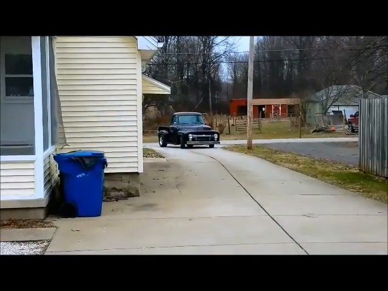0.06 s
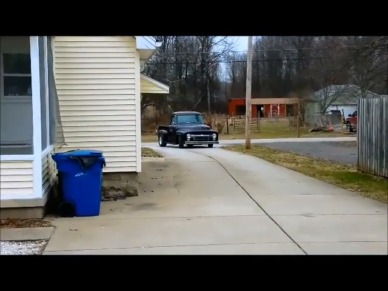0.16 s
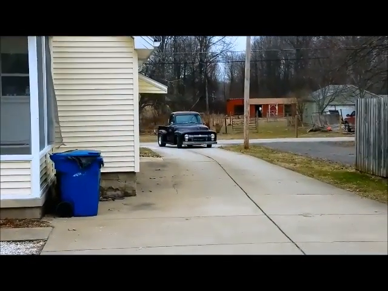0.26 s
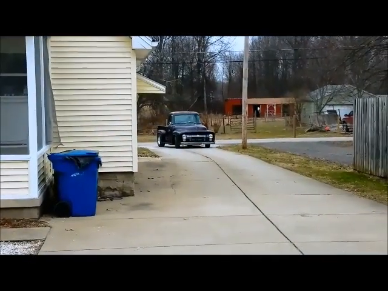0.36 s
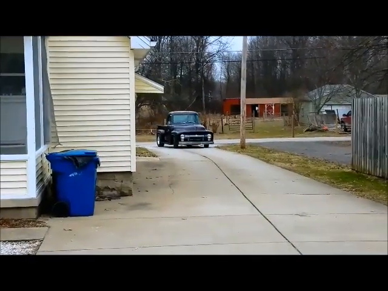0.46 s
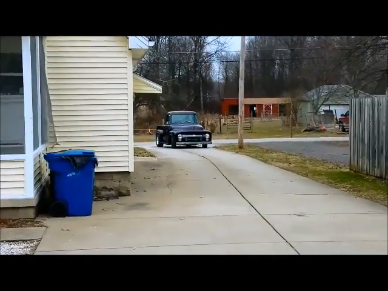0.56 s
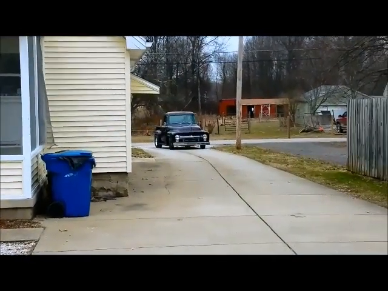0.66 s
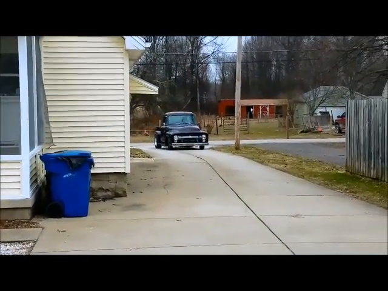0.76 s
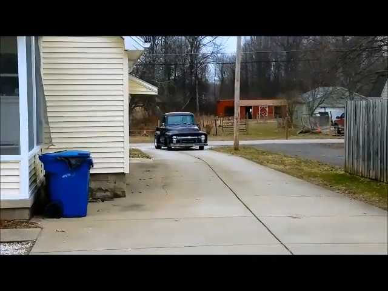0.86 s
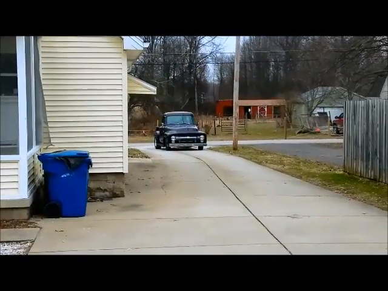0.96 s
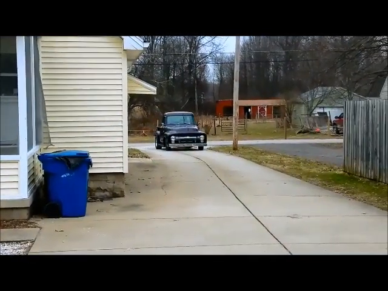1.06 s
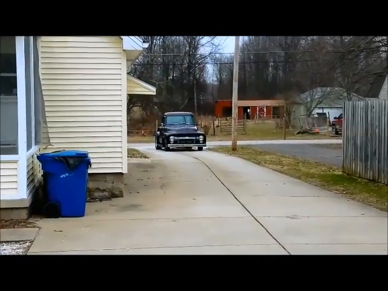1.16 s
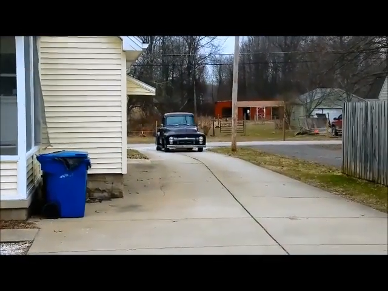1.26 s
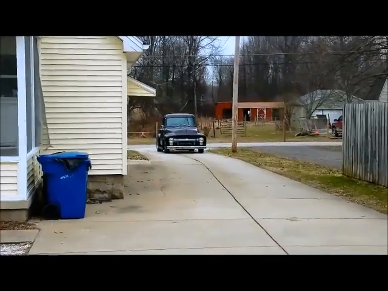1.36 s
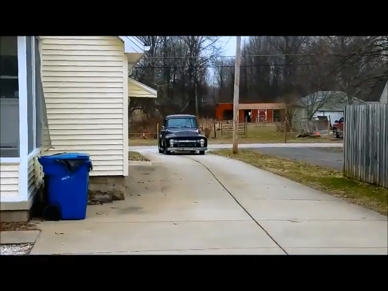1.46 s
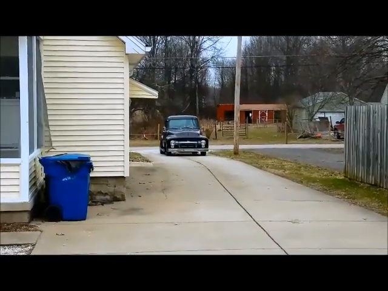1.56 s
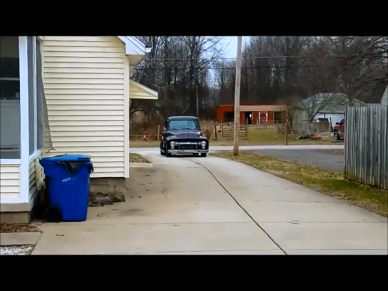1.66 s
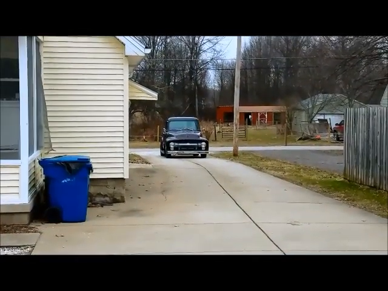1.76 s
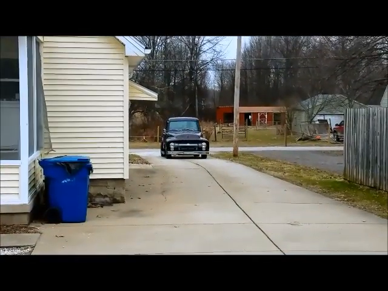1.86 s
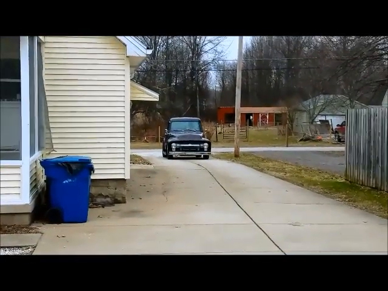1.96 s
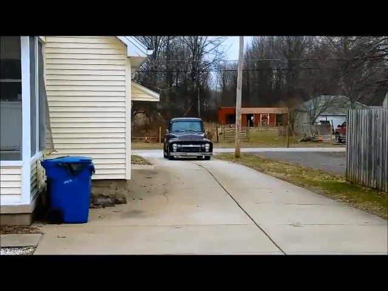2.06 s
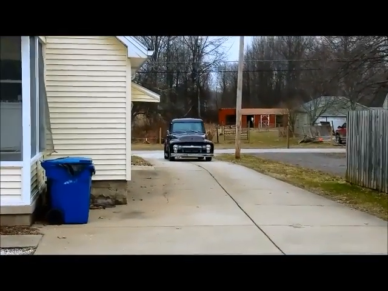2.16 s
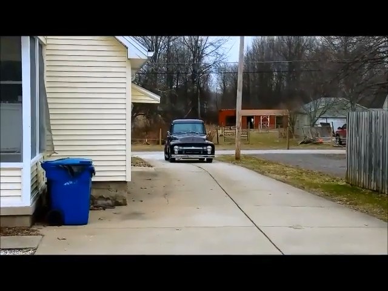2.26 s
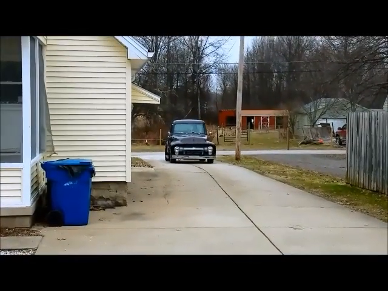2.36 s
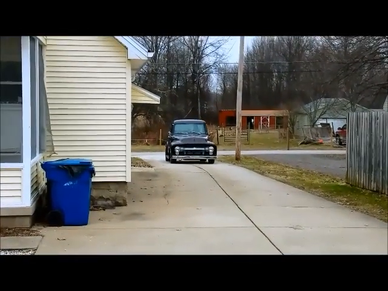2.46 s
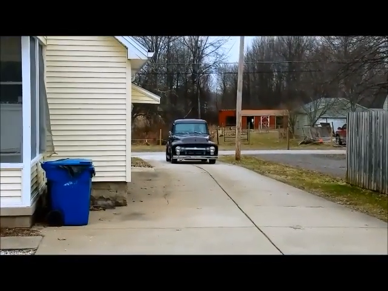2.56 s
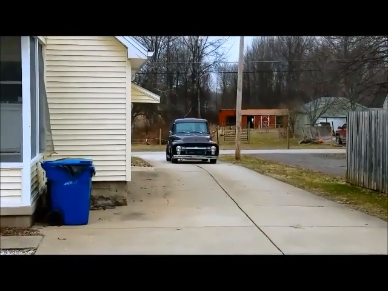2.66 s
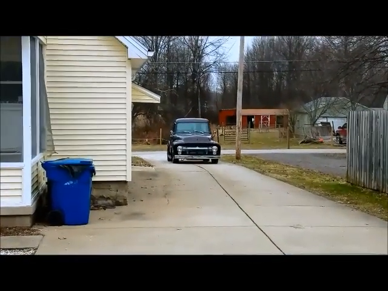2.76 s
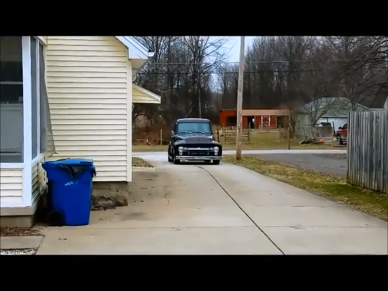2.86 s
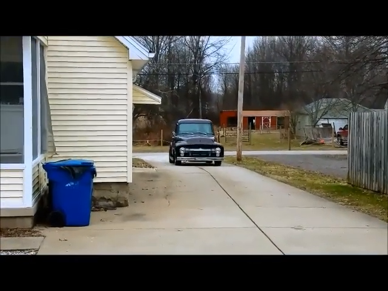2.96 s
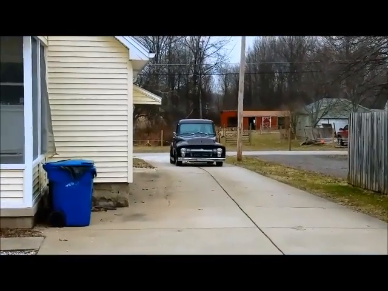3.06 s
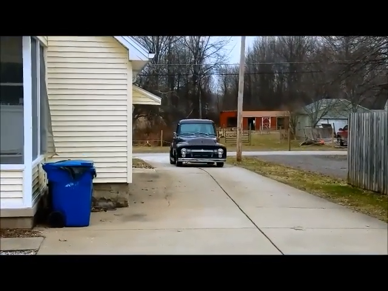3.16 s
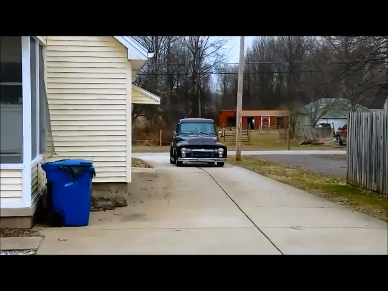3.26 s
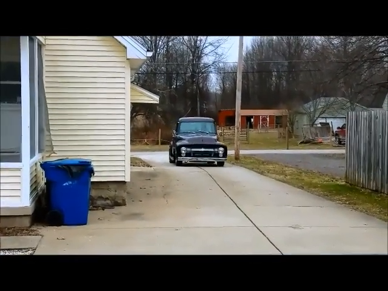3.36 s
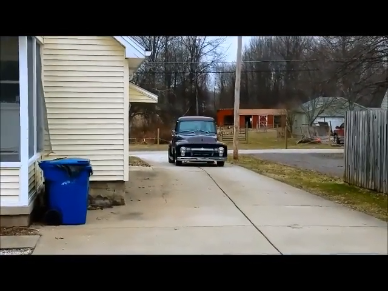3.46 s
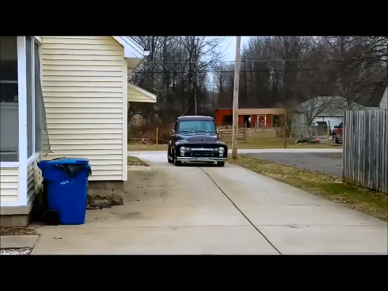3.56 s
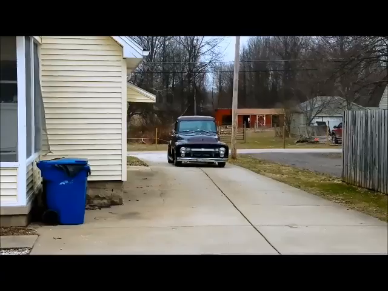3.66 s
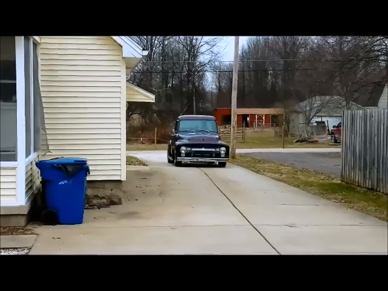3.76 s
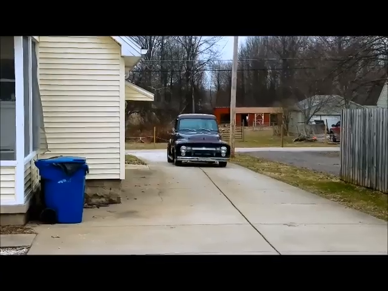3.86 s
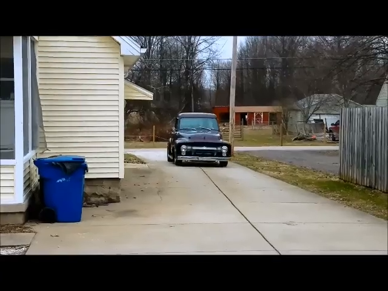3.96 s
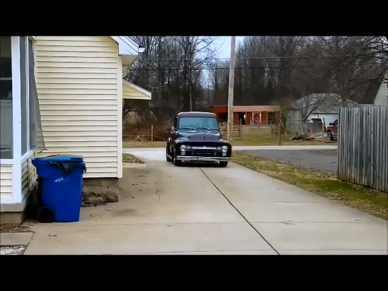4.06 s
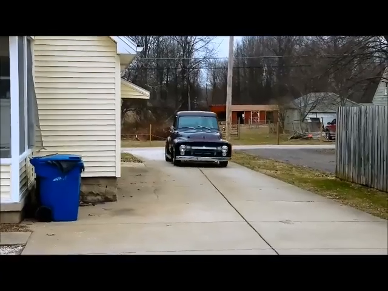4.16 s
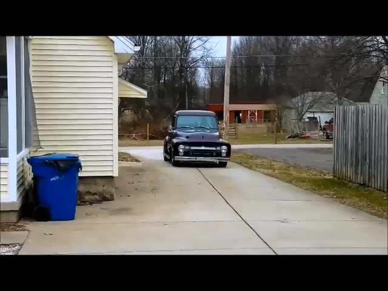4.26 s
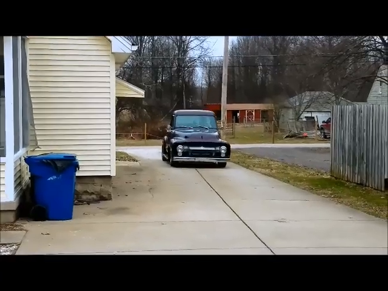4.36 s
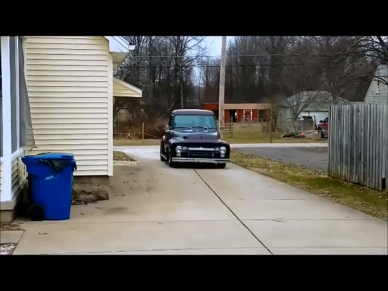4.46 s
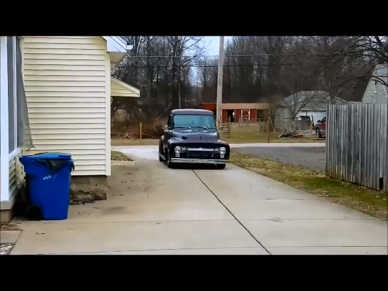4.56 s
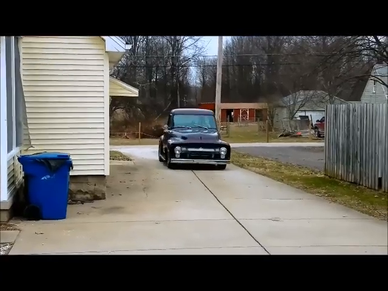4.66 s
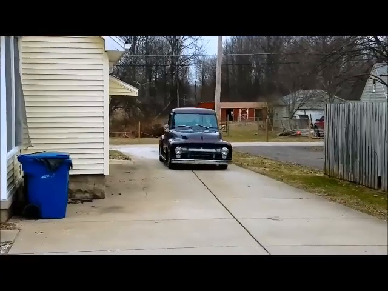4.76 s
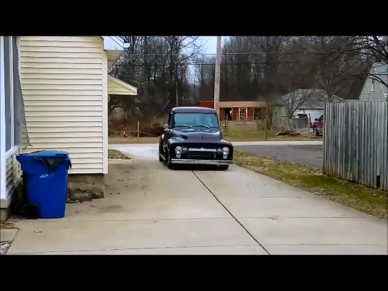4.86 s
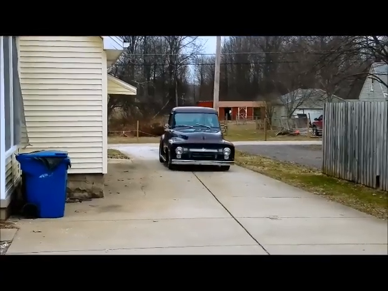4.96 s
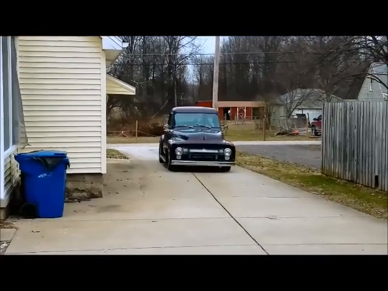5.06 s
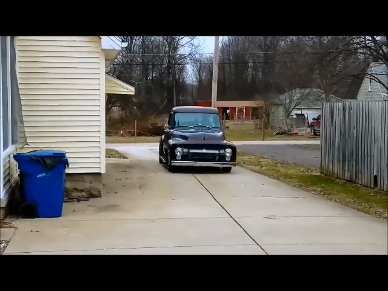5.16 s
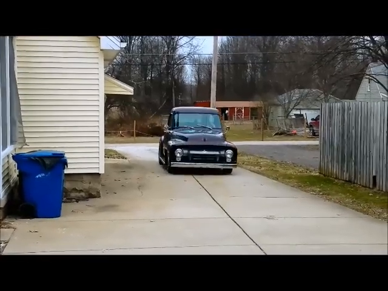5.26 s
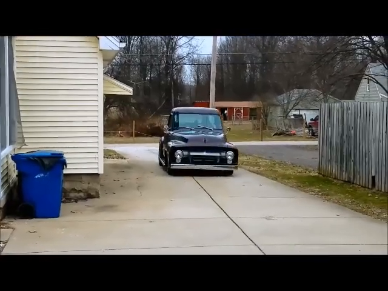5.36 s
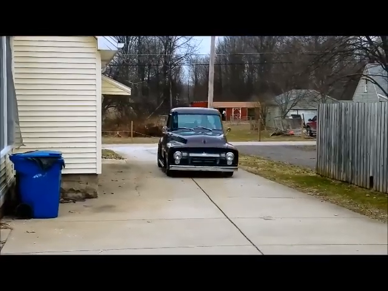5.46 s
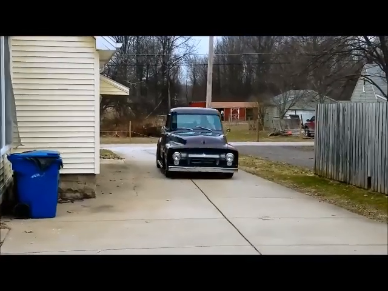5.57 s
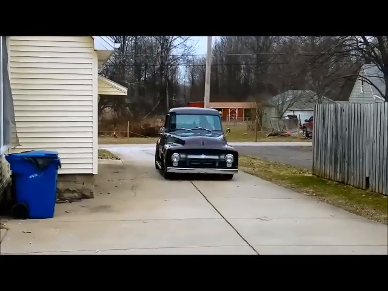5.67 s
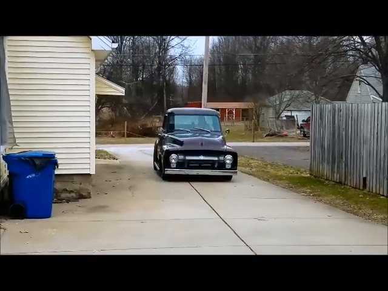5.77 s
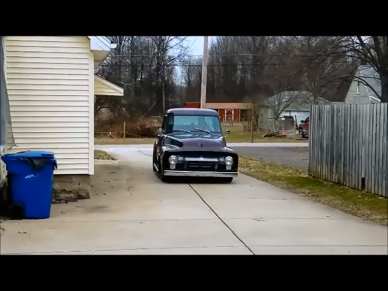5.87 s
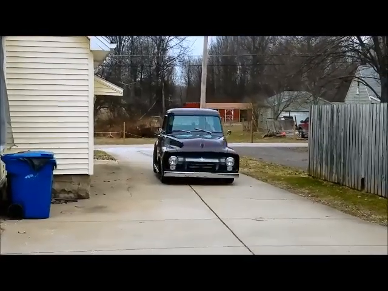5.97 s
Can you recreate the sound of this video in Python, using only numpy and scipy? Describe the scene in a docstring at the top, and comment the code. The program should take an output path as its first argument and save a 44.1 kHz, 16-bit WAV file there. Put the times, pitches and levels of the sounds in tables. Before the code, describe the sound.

An old V8 pickup burbles up a driveway towards the listener, its drone and whirr growing louder, with small clicks and cloth rustles close by.

```python
"""On a driveway off a street, an old V8 pickup turns in and rolls slowly up towards the listener; at the end it coasts.
Puffs of exhaust ring pipe resonances as a burble and bark, over a drone of harmonics of the firing rate.
Fan, valve gear and tyres whirr and hiss as shaped noise, louder as it nears; the street tyres fade away.
An electric fan hums in three partials. Close by, a jacket rustles in swells of noise, and small clicks
are brief noise bursts ringing in narrow bands."""
import sys
import numpy as np
from scipy import signal
from scipy.fft import rfft, irfft, next_fast_len
from scipy.io import wavfile
from scipy.ndimage import uniform_filter1d

SR = 44100
rng = np.random.default_rng(int(sys.argv[2]) if len(sys.argv) > 2 else 0)


def dump(signal):
    """Clip the signal to [-1, 1] and save it as 16-bit WAV at the path in sys.argv[1]."""
    limited = np.clip(np.atleast_2d(signal).T, -1, 1)
    pcm = np.round(limited * 32767).astype(np.int16)
    wavfile.write(sys.argv[1], SR, pcm)


N = 265041
# the engine is already running: the time axis [s] starts at least a quarter second before zero
SAMPLES = next_fast_len(N + SR // 4)
T = np.arange(N - SAMPLES, N) / SR

# engine speed: (time [s], firing rate [firings/s])
FIRING_RATE = [(0, 86), (.2, 85), (.88, 70.6), (1.1, 69.7), (1.4, 75.7), (1.75, 77.9), (1.95, 81.5),
               (2.4, 84.8), (2.55, 85.5), (2.7, 84.2), (2.85, 86.8), (3.1, 89.7), (3.5, 91.3), (4.35, 95.2),
               (4.8, 95.7), (5.25, 95), (5.52, 86.2), (5.65, 88.8), (6.01, 86.4)]
# the driver's foot: (time [s], throttle opening [0-1])
THROTTLE = [(0, 0.4), (.2, 0), (.45, 0.78), (.7, 0.72), (.88, 0.57), (1.22, 0.54), (1.6, 1), (1.8, 1),
            (2, 0.76), (2.56, 0.48), (2.6, 0.4), (2.75, 0.23), (2.83, 0.7), (3.1, 0.47), (3.52, 0.9),
            (5.3, 0.85), (5.52, 0.48), (5.65, 0.7), (6.01, 0.75)]
# the approach: (time [s], distance [m])
DISTANCE = [(0, 34.2), (2.4, 32.3), (3.5, 25.6), (5, 20.5), (6.01, 18.3)]
FAR_M, CRUISE_FIRINGS_PER_S = 34, 85
# swing round into the driveway, and onset of coasting
TURN_START_S, TURN_LENGTH_S = 1.14, 0.58
COAST_START_S, COAST_LENGTH_S = 5.26, 0.1

# relative puff of each cylinder in firing order, whose mean is taken off before use: strength [ratio]
CYLINDER_PUFFS = [0.95, -1.28, -0.98, 1.47, 0.7, 0.35, 0.02, -1.21]
# random spread of puff strength while driving, and what coasting adds to it [ratio]
RAGGED, RAGGED_COASTING = 0.15, 0.4
# from the tailpipes, under the truck, round its side, off house wall and fence:
# (lag at the start [s], lag at the end [s], level [dB])
EXHAUST_PATHS = [(.0021, .0021, 0), (.0137, .0034, -10.6), (.01, .0097, -15.3), (.0461, .0399, -13.8)]
# exhaust pipe resonances: (frequency [Hz], width [Hz], level [dB])
PIPE_LOW = [(100.8, 39, -3.9), (125.2, 11, 6.7), (136.1, 9, 12.1), (156, 9, 7.5), (172.6, 9, 8.2)]
# upper pipe resonances, the bark: (frequency [Hz], width [Hz], level [dB])
PIPE_HIGH = [(184.7, 9, -4.2), (201.6, 15.5, 11.5), (223, 44, 5.2), (242, 24.5, 6.3)]
# the burble swells and sinks about its level law: (time [s], level [dB])
BURBLE_SWELL = [(1.3, -1), (2, 1.5), (2.45, 0), (2.7, 1.5), (3.3, -4), (3.8, 0.5), (4.8, 0.5), (5.45, 3),
                (5.53, -1), (5.85, -0.5)]
# faint overtones of the drone: (multiple of the firing rate, level [dB])
OVERTONES = [(3, -52.5), (4, -56)]
# at one distance an echo weakens the drone's octave
NULL_SPOT_M, NULL_WIDTH_M, NULL_DEPTH_DB = 20.9, 1.7, 16

# Level laws of the truck's parts, each one row: (level when far, cruising and at half throttle [dB],
# rise per halving of distance [dB], rise per doubling of engine speed [dB],
# rise from shut to open throttle [dB], gain once turned in [dB])
# fundamental of the firing rate
DRONE_LAW = (-32.5, 5.5, 3.5, 22, 0)
# its second harmonic
OCTAVE_LAW = (-41, 4.5, -12, 18, 4.5)
# puffs in the lower pipe resonances
BURBLE_LAW = (-30, 7, 4, -3, 4.5)
# puffs in the upper pipe resonances
BARK_LAW = (-37, 4, 0, -5, 7.5)
# puffs in a narrow band above the resonances
RASP_LAW = (-56.5, 11, 5, 24.5, -2.5)
# throbbing engine noise
ROAR_LAW = (-39, 5, 3, -1, 1.5)
# pulsing fan and valve gear
WHIRR_LAW = (-51, 7.5, 4, 0.5, -1.35)
# fan air and tyres
HISS_LAW = (-64, 12, 9.5, 0, -1.5)
# bass noise
RUMBLE_LAW = (-41, 17, -16, -5, 0)

# relative noise spectrum of the roar: (frequency [Hz], density [dB per Hz])
ROAR_SPECTRUM = [(200, 8.5), (310, 5), (380, -4.5), (450, -3), (520, -1), (580, -6.5), (700, -9),
                 (930, -13.5), (1150, -14.5), (1500, -35)]
# of fan and valve gear: (frequency [Hz], density [dB per Hz])
WHIRR_SPECTRUM = [(590, -66), (1000, -4), (1100, 0.5), (1290, 1), (1400, 7), (1480, 3), (1660, 3),
                  (2150, 2), (2590, 3), (2910, -2), (3150, .5), (4260, -10), (5100, -12), (5950, -12.5),
                  (7000, -35), (9100, -52), (15400, -120)]
# of the bass rumble: (frequency [Hz], density [dB per Hz])
RUMBLE_SPECTRUM = [(20, -17.5), (45, -16.5), (65, -5.5), (120, 0.5), (300, -31), (500, -28)]
# of the tyres on the street: (frequency [Hz], density [dB per Hz])
STREET_SPECTRUM = [(600, -12), (820, 2), (1100, -8), (1500, -17)]
# of the hiss of fan air and tyres: (frequency [Hz], density [dB per Hz])
AIR_SPECTRUM = [(3500, -16), (5000, 3), (6100, 3), (6900, -3), (7800, 1.5), (10000, -0.5), (11200, -2),
                (15500, -2)]
# of the jacket cloth: (frequency [Hz], density [dB per Hz])
CLOTH_SPECTRUM = [(1000, -37), (2200, 6), (3300, 5.5), (4400, 1.5), (5800, 0.5), (6900, -16), (8000, -10),
                  (15500, -13.5)]
# stereo width of the noises: (frequency [Hz], side minus mid [dB])
WIDTH = [(60, -27), (110, -27), (200, -27), (380, -13), (700, -11.5), (1290, -1.5), (2380, -4.5), (4400, 1),
         (8120, -2.5), (15000, 0)]
# stereo balance of the noises: (frequency [Hz], left minus right [dB])
LEAN = [(60, -1.5), (500, -1.5), (1000, -2.5), (2000, 4.5), (3200, -1.5), (4500, -5), (6000, -7),
        (8000, -1), (11000, -1), (15000, 4)]

# common level of the electric fan's partials: (time [s], level [dB])
HUM_LEVEL = [(0, -64), (.5, -50.5), (1.9, -52.5), (2.1, -46.5), (3.6, -44), (4.2, -40.5), (6.01, -44.5)]
# partials of the hum: (multiple of its frequency, relative level [dB])
HUM_PARTIALS = [(1, 3.5), (2, 1), (3, -15)]
# jacket rustles: (time of the middle [s], level [dB], length [s], added treble [dB])
RUSTLES = [(0.087, -51, 0.048, -18), (0.187, -52.5, 0.048, -10), (0.273, -52.5, 0.052, -10),
           (0.467, -48.5, 0.027, -3), (0.51, -50, 0.032, -4), (0.624, -54, 0.044, 0),
           (0.728, -54.5, 0.039, -1), (0.792, -56, 0.092, 0), (1.17, -57, 0.013, -6),
           (2.627, -57.5, 0.04, 5), (3.317, -55.5, 0.06, 7.5), (4.128, -57.5, 0.05, 9),
           (4.24, -60.5, 0.046, 14.5), (4.417, -51, 0.047, 3.5), (4.652, -49, 0.066, 3.5),
           (4.859, -53, 0.03, 9.5), (4.937, -49, 0.053, 7.5), (5.156, -48, 0.054, 5.5),
           (5.528, -48.5, 0.055, 8.5)]
# small clicks: (time [s], peak level [dB], lower band edge [Hz], upper band edge [Hz])
CLICKS = [(.819, -34.5, 1500, 3000), (0.9966, -26.5, 1970, 3300), (1.0233, -26.5, 1000, 3500),
          (1.0255, -32, 800, 1790), (1.0325, -33.5, 1300, 3480), (1.0615, -41, 2200, 4100),
          (1.1627, -39, 1490, 6200), (1.1662, -33, 750, 3000), (1.1928, -39, 1500, 4500),
          (2.562, -38, 1700, 3200), (2.827, -47, 8500, 11400)]


def from_db(db):
    """Amplitude ratio: twenty decibels are a factor of ten."""
    return 10 ** (np.asarray(db) / 20)


def rms_one(x):
    """Normalisation of a signal to unit mean power."""
    return x / np.sqrt(np.mean(x ** 2) + 1e-20)


def in_time(rows):
    """Linear interpolation: each column of a curve table at every sample."""
    s, *columns = np.transpose(rows)
    return [np.interp(T, s, column) for column in columns]


def at_hz(points, hz):
    """Linear interpolation of a spectrum along a logarithmic frequency axis."""
    f, value = np.transpose(points)
    return np.interp(np.log(hz), np.log(f), value)


def ramp(start_s, length_s):
    """Linear transition from 0 to 1, then held."""
    return np.clip((T - start_s) / length_s, 0, 1)


def drift(rate_hz):
    """Low-passed random fluctuation of unit rms, made at a fortieth of the sample rate."""
    step, settling = 40, 2000
    r = np.exp(-2 * np.pi * rate_hz * step / SR)
    white = rng.standard_normal(SAMPLES // step + 2 + settling)
    slow = signal.lfilter([1], [1, -2 * r, r * r], white)[settling:]
    return np.interp(np.arange(SAMPLES) / step, np.arange(len(slow)), rms_one(slow))


def resonate(x, hz, width_hz):
    """Damped resonance: a pole pair whose radius sets the bandwidth, with unit gain at its peak."""
    r = np.exp(-np.pi * width_hz / SR)
    numerator = np.array([1, 0, -1]) * (1 - r * r) / 2
    denominator = [1, -2 * r * np.cos(2 * np.pi * hz / SR), r * r]
    return signal.lfilter(numerator, denominator, x + 1e-18)


def band(x, low_hz, high_hz, order):
    """Band limitation by a Butterworth filter, maximally flat in its passband."""
    return signal.sosfilt(signal.butter(order, [low_hz, high_hz], "band", fs=SR, output="sos"), x)


def evened(x):
    """Short-term power normalisation over a few engine cycles, with the single beats kept."""
    size = SR // 6
    power = uniform_filter1d(uniform_filter1d(x * x, size), size // 2)
    return x / np.sqrt(power + 1e-14)


def noise(spectrum):
    """Spectral shaping of stereo noise, narrow in the bass and wide in the treble; its middle has rms 1."""
    hz = np.maximum(np.arange(SAMPLES // 2 + 1) * SR / SAMPLES, 1)
    octaves_outside = np.abs(np.log2(hz / np.clip(hz, spectrum[0][0], spectrum[-1][0])))
    # beyond the table the spectrum falls by 60 dB per octave
    shape = from_db(at_hz(spectrum, hz) - 60 * octaves_outside)
    mid, side = rfft(rng.standard_normal((2, SAMPLES))) * shape
    signs = np.array([[1], [-1]])
    spread = mid + signs * side * from_db(at_hz(WIDTH, hz))
    pair = irfft(spread * from_db(signs * at_hz(LEAN, hz) / 2), SAMPLES)
    return pair / np.std(pair.mean(axis=0))


def delayed(x, s):
    """Propagation delay: the same sound arrives later."""
    return np.interp(T - s, T, x, left=0)


def ahead(x, pan_db=-2.0):
    """Interaural difference: a source slightly to the right is later and weaker at the left ear."""
    left = delayed(x, 3 / SR)
    return np.array([left * from_db(pan_db / 2), x * from_db(-pan_db / 2)])


def off_wall(x, wall_db=-16, fence_db=-17, ground_db=-17):
    """Comb filtering: reflections from wall, fence and driveway ripple the spectrum gently."""
    paths = [(0.0046, wall_db), (0.0113, fence_db), (0.001393, ground_db)]
    return x + sum(from_db(db) * np.array([delayed(channel, s) for channel in x]) for s, db in paths)


def level(law):
    """Superposed level changes [dB] from distance, engine speed, throttle and heading."""
    far_db, nearing_db, revving_db, throttle_db, turn_db = law
    (metres,), (speed,), (throttle,) = in_time(DISTANCE), in_time(FIRING_RATE), in_time(THROTTLE)
    return (far_db
            + nearing_db * np.log2(FAR_M / metres)
            + revving_db * np.log2(speed / CRUISE_FIRINGS_PER_S)
            + throttle_db * (throttle - 0.5)
            + turn_db * ramp(TURN_START_S, TURN_LENGTH_S))


def raggedness():
    """Irregular combustion: the spread of firing strength grows while the engine coasts."""
    return RAGGED + RAGGED_COASTING * ramp(COAST_START_S, COAST_LENGTH_S)


def puffs(firings):
    """Pulse excitation, one puff a firing; the uneven turns of the V8's two banks make the burble."""
    at = np.flatnonzero(np.diff(np.floor(firings)))
    chance = rng.standard_normal((len(at), 2))
    ragged = raggedness()[at]
    pattern = np.array(CYLINDER_PUFFS) - np.mean(CYLINDER_PUFFS)
    cylinder = np.floor(firings[at]).astype(int) % len(pattern)
    strength = pattern[cylinder] + ragged * chance[:, 0]
    # ragged firings also stray in time
    late_s = 0.0007 * ragged * chance[:, 1]
    out = np.zeros(SAMPLES)
    out[np.clip(at + (late_s * SR).astype(int), 0, SAMPLES - 1)] = strength
    return out


def pipe(x, modes):
    """Modal superposition: pipe resonances side by side, with alternating signs."""
    return sum((-1) ** k * from_db(db) * resonate(x, hz, width_hz)
               for k, (hz, width_hz, db) in enumerate(modes))


def uneven_exhaust(firings):
    """Forced resonance: uneven puffs ring the pipes and reach the listener by several shifting paths."""
    fired = puffs(firings)
    beats = 0
    for first_s, last_s, db in EXHAUST_PATHS:
        lag_s = np.interp(T, [0, T[-1]], [first_s, last_s])
        beats = beats + from_db(db) * delayed(fired, lag_s)
    low = evened(band(pipe(beats, PIPE_LOW), low_hz=71.4, high_hz=187.8, order=4))
    high = evened(band(pipe(beats, PIPE_HIGH), low_hz=176.3, high_hz=278.0, order=3))
    above = evened(band(beats, low_hz=270.8, high_hz=293.7, order=2))
    burble = from_db(level(BURBLE_LAW) + in_time(BURBLE_SWELL)[0]) * low
    bark = from_db(level(BARK_LAW)) * high
    rasp = from_db(level(RASP_LAW)) * above
    return burble + bark + rasp


def octave_loss():
    """Interference: the loss [dB] of the drone's octave near the spot where an echo opposes it."""
    return NULL_DEPTH_DB * np.exp(-((in_time(DISTANCE)[0] - NULL_SPOT_M) / NULL_WIDTH_M) ** 2)


def even_exhaust(firings, shudder_db=-32.5):
    """Harmonic series: even firing is a clean drone, joined by a shudder at 3/4 the rate when coasting."""
    angle = 2 * np.pi * firings
    fundamental = from_db(level(DRONE_LAW)) * np.cos(angle)
    octave = from_db(level(OCTAVE_LAW) - octave_loss()) * np.cos(2 * angle)
    overtones = sum(from_db(db) * np.cos(k * angle) for k, db in OVERTONES)
    drone = fundamental + octave + overtones * ramp(TURN_START_S, TURN_LENGTH_S)
    # no two cycles burn quite alike
    drone = drone * from_db(1.04 * drift(14.4))
    shudder = from_db(shudder_db) * ramp(COAST_START_S, COAST_LENGTH_S) * np.sin(angle * 3 / 4)
    # the root of two turns sine peaks into rms levels
    return np.sqrt(2) * (drone + shudder)


def exhaust(firings):
    """Superposition of the uneven and the even part of the firing, heard from ahead."""
    return ahead(uneven_exhaust(firings) + even_exhaust(firings))


def cyclic(x, cycles, share):
    """Partial periodicity: the engine repeats part of its clatter every cycle."""
    one_cycle_ago = np.interp(cycles - 1, cycles, np.arange(SAMPLES)).astype(int)
    repeat = x[:, one_cycle_ago] * (cycles > cycles[0] + 1)
    return (x + share * repeat) / np.sqrt(1 + share ** 2)


def engine_bay(firings, throb=0.082, tick=0.023):
    """Amplitude modulation: roar throbs three times an engine cycle, whirr pulses with the crankshaft."""
    cycles = firings / len(CYLINDER_PUFFS)
    throbbing = 1 + throb * np.cos(6 * np.pi * cycles)
    # the crankshaft turns twice an engine cycle
    ticking = 1 + tick * np.cos(4 * np.pi * cycles)
    roar_gain = from_db(level(ROAR_LAW) + 0.5 * drift(22))
    roar = roar_gain * throbbing * cyclic(noise(ROAR_SPECTRUM), cycles, share=0.37)
    whirr_gain = from_db(level(WHIRR_LAW) + 0.89 * drift(28.0))
    whirr = whirr_gain * ticking * cyclic(noise(WHIRR_SPECTRUM), cycles, share=0.15)
    return off_wall(roar + whirr)


def rumble():
    """Low-frequency noise of the truck, its level following the common level law."""
    return from_db(level(RUMBLE_LAW)) * noise(RUMBLE_SPECTRUM)


def street(start_db=-51.5, fall_db_per_s=7):
    """Exponential decay: tyre noise on the street dies away as the truck slows for the turn."""
    return from_db(start_db - fall_db_per_s * T) * noise(STREET_SPECTRUM)


def electric_fan(hum_hz=252.7, waver=0.00044, flutter_db=0.47):
    """Tonal radiation: a fan independent of engine speed hums on three partials, nearly steady in pitch."""
    turns = np.cumsum(hum_hz * (1 + waver * drift(1.0))) / SR
    partials = sum(from_db(db + flutter_db * drift(3.5)) * np.sin(2 * np.pi * k * turns)
                   for k, db in HUM_PARTIALS)
    return ahead(from_db(in_time(HUM_LEVEL)[0]) * partials)


def hiss():
    """Broadband turbulence and friction: fan air and tyres hiss with a slightly fluctuating level."""
    return from_db(level(HISS_LAW) + 0.91 * drift(12)) * noise(AIR_SPECTRUM)


def jacket(abruptness=2.03, grain_db=2.0, pan_db=-0.5):
    """Friction noise: cloth slides over cloth in short grainy swishes, some crisper than others."""
    cloth = noise(CLOTH_SPECTRUM)
    crisp = band(cloth, low_hz=6260, high_hz=16000, order=1)
    swishes = 0
    for s, db, length_s, treble_db in RUSTLES:
        swell = np.exp(-np.pi / 2 * np.abs((T - s) / length_s) ** abruptness)
        swishes = swishes + from_db(db) * swell * (cloth + (from_db(treble_db) - 1) * crisp)
    return swishes * from_db(grain_db * drift(130)) * from_db([[pan_db], [-pan_db]])


def clicks(decay_s=0.001):
    """Impulsive excitation: each click is a brief decaying crackle, ringing in its own band."""
    out = np.zeros((2, SAMPLES))
    t = np.arange(SR // 10) / SR
    for s, db, low_hz, high_hz in CLICKS:
        crackle = rng.standard_normal(len(t)) * np.exp(-t / decay_s)
        sound = band(crackle, low_hz, high_hz, order=3)
        at = np.searchsorted(T, s)
        # the same sound in both ears, set to its peak level
        out[:, at:at + len(t)] += from_db(db) * sound / np.abs(sound).max()
    return out


def scene():
    """Superposition of the truck, its hiss of fan air and tyres, and the small sounds nearby."""
    # firings counted from time zero
    firings = np.cumsum(in_time(FIRING_RATE)[0]) / SR
    firings = firings - firings[-N]
    truck = exhaust(firings) + engine_bay(firings) + rumble() + street() + electric_fan()
    return (truck + off_wall(hiss() + jacket()) + clicks())[:, -N:]


def record(dry, opening_s=0.006, cutoff_hz=15800):
    """Band limitation: a short fade opens the sound without a click, and the top is cut steeply."""
    opening = np.minimum(np.arange(N) / (opening_s * SR), 1)
    low_pass = signal.ellip(12, 0.1, 80, cutoff_hz, fs=SR, output="sos")
    return signal.sosfilt(low_pass, dry * opening)


dry = scene()
out = record(dry)
dump(out)
```